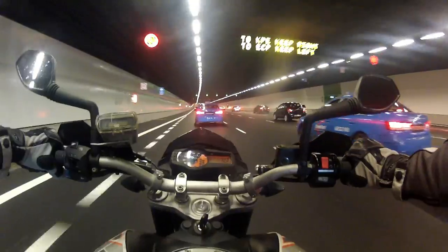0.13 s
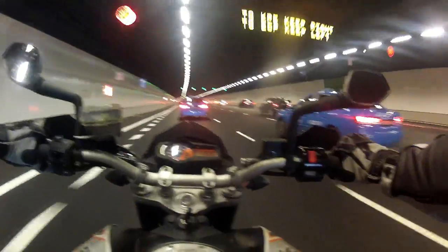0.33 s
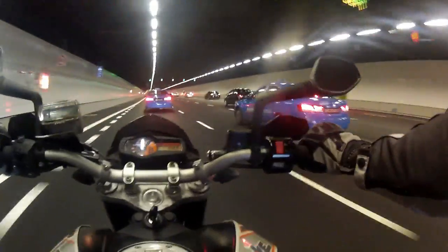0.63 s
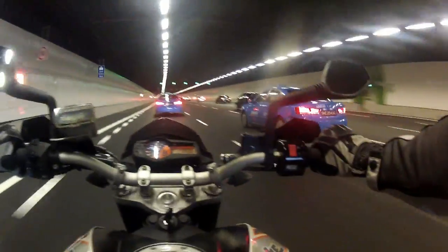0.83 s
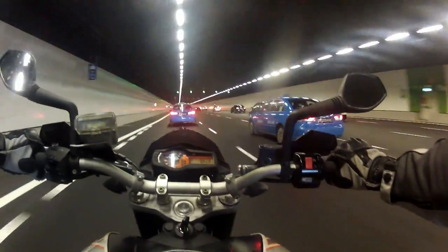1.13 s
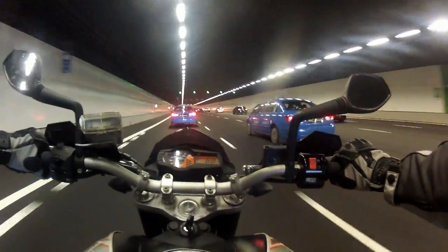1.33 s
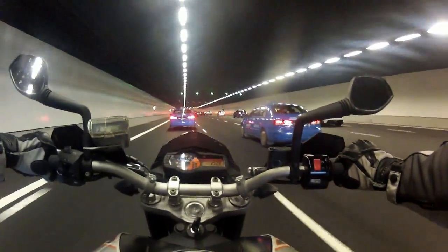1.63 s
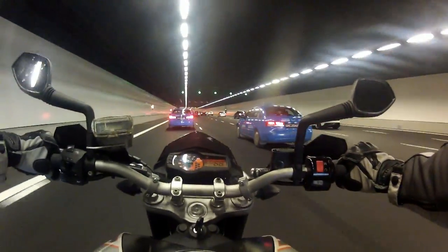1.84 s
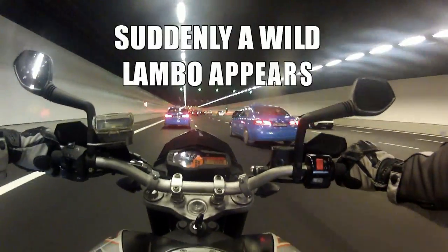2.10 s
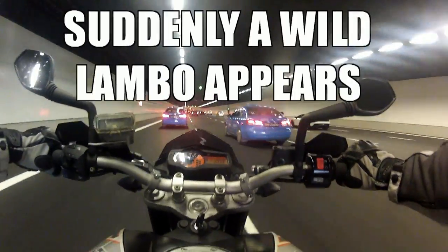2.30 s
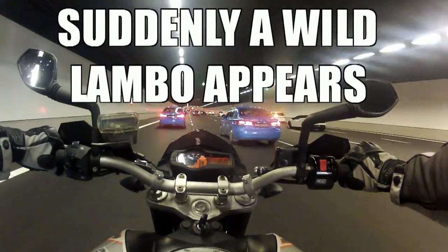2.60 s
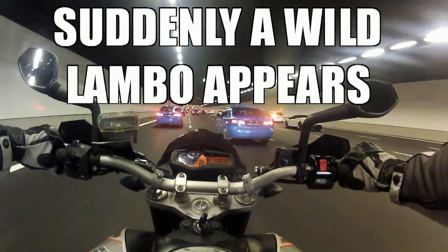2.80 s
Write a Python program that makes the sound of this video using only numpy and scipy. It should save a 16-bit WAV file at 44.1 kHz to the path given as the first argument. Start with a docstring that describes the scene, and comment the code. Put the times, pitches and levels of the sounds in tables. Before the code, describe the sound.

A motorcycle engine drones through a road tunnel, with muffled wind buffeting and traffic roar

```python
"""Motorcycle ride through a tunnel

Heard by a small camera in a closed housing. Engine orders, sines at multiples of the cycle rate, drone through
frame and tunnel. The airstream buffets and hisses as band noise; wind slaps and one brief tone are swelling sines.
Tyres and traffic roar as muffled noise; a second drone passes and faint noise ticks sound.
The recorder rides its gain and holds each sample of a 12 kHz stream, which mirrors the bass into the treble."""
import sys
import numpy as np
from scipy import signal
from scipy.io import wavfile

SR = 44100
rng = np.random.default_rng(int(sys.argv[2]) if len(sys.argv) > 2 else 0)


def generate_wav(sig):
    """Save sig (samples, or channels by samples) to the path in sys.argv[1] as 16-bit PCM at SR."""
    pcm = np.round(np.clip(np.atleast_2d(sig).T, -1, 1) * 32767).astype(np.int16)
    wavfile.write(sys.argv[1], SR, pcm)


def how_loud(loudness_db):
    """Turn decibels into a plain amplitude multiplier (0 dB gives 1, 20 dB gives 10)."""
    steps = np.asarray(loudness_db, float) / 20
    return 10 ** steps


N = 130095

# Engine. Each row: time in seconds, cycle rate in Hz, rms of the 4th and of the 8th order in dB.
ENGINE = [(0.08, 34.45, -26, -23), (0.12, 35.08, -27, -15), (0.22, 34.73, -25, -38.5),
          (0.25, 34.56, -23, -20.5), (0.33, 34.84, -30, -22), (0.4, 34.65, -23.5, -49),
          (0.43, 34.08, -23, -35), (0.5, 34.17, -29, -37), (0.52, 34.1, -31, -66),
          (0.55, 34.52, -40, -22.5), (0.65, 34.19, -23, -25), (0.7, 34.03, -41, -33),
          (0.76, 34.18, -25, -25), (0.79, 34.34, -33, -20.5), (0.87, 34.5, -23, -35),
          (0.92, 34.45, -20, -20), (0.98, 34.53, -30, -21), (1.11, 34.36, -27.5, -19.5),
          (1.14, 34.57, -34, -33), (1.2, 34.91, -35, -22), (1.29, 34.49, -27, -48), (1.33, 34.4, -37, -27),
          (1.37, 34.62, -28, -46), (1.41, 34.34, -46, -35), (1.44, 34.57, -29, -34),
          (1.51, 34.7, -24.5, -25), (1.54, 34.7, -33.5, -21.5), (1.62, 34.92, -23.5, -20),
          (1.81, 35.91, -40, -18), (1.89, 35.55, -23.5, -19), (2.07, 35.81, -26.5, -19.5),
          (2.12, 36.3, -43, -19), (2.21, 35.7, -32, -25.5), (2.28, 35.77, -21, -18.5),
          (2.33, 36.19, -34.5, -17), (2.38, 35.94, -25.5, -33.5), (2.46, 35.99, -22, -21),
          (2.58, 36.05, -24, -36), (2.71, 36.16, -21.5, -26), (2.77, 36.77, -26, -53),
          (2.79, 36.54, -24, -20), (2.85, 36.2, -21.5, -23.5), (2.86, 36.3, -21.5, -42),
          (2.93, 36.44, -28, -18.5)]
# Weaker orders. Each row: multiple of the cycle rate, base level in dB, share of the buffeting swing followed.
WEAK_ORDERS = [(1, -48, 0.73), (2, -37.5, 0.82), (3, -36.5, 0.6), (5, -35, 0.48), (6, -37, 0.14),
               (7, -37, 0.34), (9, -34.5, 0.19), (10, -38, .3), (12, -42, 0.18), (14, -39, .1),
               (16, -45, 0.082), (18, -45, .1), (20, -45.5, .1)]
# Weaker orders standing out. Each row: centre in seconds, length in seconds, multiple, peak rms in dB.
ORDER_SWELLS = [(0.224, 0.8, 3, -29), (0.206, 0.14, 6, -27), (0.334, 0.098, 10, -23), (0.655, 0.4, 3, -26),
                (.95, 0.12, 3, -34), (0.946, 0.32, 6, -30), (1.1, 0.19, 10, -33), (1.31, .7, 12, -32),
                (2.002, 1.0, 12, -29), (1.628, 0.16, 20, -34), (1.883, .35, 16, -31),
                (1.957, .14, 18, -34.5), (2.092, 0.52, 14, -41.5), (2.433, 0.082, 6, -24.5),
                (2.714, 0.54, 6, -26.5), (2.744, 0.42, 7, -27.5)]
WAVER_DB, WAVER_HZ, PHASE_WANDER_RAD = 3.5, 2.74, 0.35

# Airstream strength. Each row: time in seconds, hiss level in dB, buffeting level in dB.
GUST = [(.06, -40.5, -37.5), (.3, -41.5, -23), (.5, -41.5, -25.5), (.62, -38.5, -34), (.8, -38, -18.5),
        (.95, -36, -19.5), (1.1, -39, -21.5), (1.26, -38.5, -28.5), (1.5, -38, -26.5), (1.62, -41.5, -29.5),
        (1.8, -44.5, -41.5), (1.92, -42.5, -28.5), (2.05, -50.5, -42), (2.2, -46, -34.5),
        (2.36, -45.5, -36), (2.5, -40, -28), (2.65, -40, -29), (2.8, -38.5, -27.5), (2.95, -40.5, -33)]
# Hiss spectrum. Each row: frequency in Hz, relative density in dB per Hz.
HISS_SPECTRUM = [(600, -29.5), (900, -8), (1380, -9.5), (1900, -4.5), (2500, -8.5), (3100, -9),
                 (3500, -22.5), (3800, -11), (4300, -19), (5000, -14), (6300, -23)]
# Throb of the hiss once an engine cycle. Each row: time in seconds, depth as a fraction.
HISS_THROB = [(0, .25), (.3, 0.05), (1.1, 0), (1.25, 0.34), (1.55, 0.28), (1.8, 0.16), (2.2, 0.23),
              (2.5, 0.25), (2.75, 0.13), (2.95, 0.1)]
THROB_PEAK_S = 1.414  # moment of one throb
# Housing cavities the hiss rings in. Each row: frequency in Hz, width in Hz, level relative to the air in dB.
CAVITIES = [(2430, 280, -7.5), (3220, 300, -13.5), (3850, 130, -16.5), (4340, 120, -26.5)]
# Buffeting spectrum. Each row: frequency in Hz, relative density in dB per Hz.
BUFFET_SPECTRUM = [(18, -4), (30, -4.5), (70, -5), (130, -7), (250, -8), (450, -15), (800, -28),
                   (1200, -25)]
# Slaps of wind and one brief tone. Each row: start in seconds, sine level before its swell in dB,
# pitch in Hz, length in cycles.
SLAPS_AND_TONE = [(0.393, -19, 107, 1.1), (0.416, -21, 135, 1.3), (0.473, -5.5, 100, 1.64),
                  (.757, -28, 91, 0.76), (2.497, -14.5, 330, 13.5), (2.855, -17, 60, 1.6)]

# Roar spectrum. Each row: frequency in Hz, relative density in dB per Hz.
ROAR_SPECTRUM = [(40, -18), (100, -8), (200, -7.5), (330, 1), (480, -7.5), (600, -4.5), (700, -4),
                 (900, -3.5), (1300, -18)]
ROAR_DB, ROAR_FOLLOWS = -22, 0.62  # level before muffling, share of the hiss swing followed
ROAR_CUT_HZ, ROAR_LEAK_DB = 702, -24  # the housing shuts out the roar above this, but for a leak
# Steady tyre hiss spectrum. Each row: frequency in Hz, relative density in dB per Hz.
TYRE_SPECTRUM = [(900, 9.5), (1500, -5.5), (2400, -1.5), (3400, -12.5), (4500, -12.5), (6300, -29)]
TYRES_DB = -46

# Second drone, likely a car alongside. Each row: time in seconds, pitch in Hz before NEIGHBOUR_TUNE, rms in dB.
NEIGHBOUR = [(1.45, 351.4, -28), (1.549, 361.8, -24.5), (1.698, 363.2, -25), (1.85, 369, -30),
             (2.05, 369.4, -29), (2.3, 375, -32)]
NEIGHBOUR_TUNE = 0.97
# Faint ticks, perhaps the mount. Each row: start in seconds, initial noise level before the band-pass in dB.
TICKS = [(1.256, -29), (1.977, -33), (2.116, -35.5), (2.78, -31)]
TICK_DECAY_S = 0.004

# Recorder.
START_S = 0.0575
THRESHOLD_DB, SQUEEZE_DB_PER_DB, RELEASE_DB_PER_S, ATTACK_S = -10, 0.7, 150, 0.002
BAND_EDGE_HZ, EDGE_LEAK_DB = 5420, -11.5


def in_time(rows):
    """Columns of a table after the time, joined by straight lines."""
    time_s, *columns = np.transpose(rows)
    return [np.interp(np.arange(N) / SR, time_s, column) for column in columns]


def rms_one(x):
    """Scale to unit rms."""
    return x / np.sqrt(np.mean(x ** 2) + 1e-20)


def drift(rate_hz):
    """Slow random drift of unit spread: noise through a two-pole low-pass at SR / 40."""
    pole = np.exp(-80 * np.pi * rate_hz / SR)
    noise = rng.standard_normal(N // 40 + 2002)
    slow = signal.lfilter([1], [1, -2 * pole, pole * pole], noise)[2000:]  # settled part
    return np.interp(np.arange(N) / 40, np.arange(len(slow)), rms_one(slow))


def banded_noise(spectrum, shared_db, own_db, rate_hz):
    """Third-octave bands of noise that swell together and flicker alone; rms 1."""
    hz, level_db = np.transpose(spectrum)
    bands = int(3 * np.log2(hz[-1] / hz[0]))
    edges_hz = hz[0] * 2 ** (np.arange(bands + 1) / 3)
    white = rng.standard_normal((2, N))  # neighbouring bands take different noise
    together = drift(rate_hz)
    out = 0
    for k, (low, high) in enumerate(zip(edges_hz, edges_hz[1:])):
        sos = signal.butter(2, [low, high], "band", fs=SR, output="sos")
        band = signal.sosfilt(sos, white[k % 2])
        mean_db = np.interp(np.log(low * high) / 2, np.log(hz), level_db)
        out = out + band * how_loud(mean_db + shared_db * together + own_db * drift(rate_hz))
    return rms_one(out)


def order(phase, multiple, level_db):
    """One order: a sine of given rms whose phase wanders a little."""
    wander = PHASE_WANDER_RAD * drift(9.9) + rng.uniform(0, 2 * np.pi)
    return np.sqrt(2) * how_loud(level_db) * np.sin(multiple * phase + wander)


def engine(phase, swing_db):
    """Two strong orders swell and fade; weaker ones waver, follow the buffeting and now and then stand out."""
    t = np.arange(N) / SR
    _, fourth_db, eighth_db = in_time(ENGINE)
    out = order(phase, 4, fourth_db) + order(phase, 8, eighth_db)
    for multiple, level_db, follows in WEAK_ORDERS:
        size = how_loud(level_db + follows * swing_db + WAVER_DB * drift(WAVER_HZ))
        for centre_s, length_s, swelling, peak_db in ORDER_SWELLS:
            if round(swelling) == round(multiple):
                arch = np.cos(np.pi * np.clip((t - centre_s) / length_s, -0.5, 0.5))
                size = size + how_loud(peak_db) * arch
        out += size * order(phase, round(multiple), 0)
    return out


def buffeting(level_db):
    """Airstream turbulence at the housing: low noise whose bands swell strongly."""
    return how_loud(level_db) * banded_noise(BUFFET_SPECTRUM, shared_db=2.5, own_db=6.5, rate_hz=10.5)


def hiss(phase, level_db):
    """Air rushing past the housing rings in its cavities, partly shaken in step with the engine."""
    turn = phase - phase[int(THROB_PEAK_S * SR)]
    throb = 1 + in_time(HISS_THROB)[0] * (np.cos(turn) + 0.52 * np.cos(2 * turn))
    air = banded_noise(HISS_SPECTRUM, shared_db=-0.5, own_db=0.53, rate_hz=28)
    rings = 0
    for hz, width_hz, db in CAVITIES:
        b, a = signal.iirpeak(hz, hz / width_hz, fs=SR)
        rings = rings + how_loud(db) * rms_one(signal.lfilter(b, a, air))
    return how_loud(level_db) * throb * rms_one(air + rings)


def slaps_and_tone():
    """Slaps of wind and one brief tone: each swings for its number of cycles under a sine-squared swell."""
    out = np.zeros(N + SR)
    t = np.arange(SR // 8) / SR
    for start_s, db, hz, cycles in SLAPS_AND_TONE:
        first = int(start_s * SR)
        swell = np.sin(np.pi * np.minimum(t * hz / cycles, 1)) ** 2
        out[first:first + len(t)] -= how_loud(db) * swell * np.sin(2 * np.pi * hz * t)
    return out[:N]


def road(swing_db):
    """Roar of tyres and traffic in the tunnel, muffled by the housing, over a faint tyre hiss."""
    roar = banded_noise(ROAR_SPECTRUM, shared_db=1.46, own_db=0.0, rate_hz=15)
    sos = signal.butter(N=8, Wn=ROAR_CUT_HZ, fs=SR, output="sos")
    leak = how_loud(ROAR_LEAK_DB + 2.5 * drift(9.9)) * roar
    muffled = signal.sosfilt(sos, roar) + leak
    tyres = how_loud(TYRES_DB) * banded_noise(TYRE_SPECTRUM, shared_db=2.4, own_db=0.5, rate_hz=26.0)
    return how_loud(ROAR_DB + ROAR_FOLLOWS * swing_db) * muffled + tyres


def neighbour():
    """One gliding tone that fades in and out."""
    hz, level_db = in_time(NEIGHBOUR)
    t = np.arange(N) / SR
    inside_s = np.minimum(t - NEIGHBOUR[0][0], NEIGHBOUR[-1][0] - t)
    fade = np.clip(inside_s / 0.13 + 1, 0, 1)
    phase = 2 * np.pi * np.cumsum(hz) / SR
    return fade * order(phase, NEIGHBOUR_TUNE, level_db)


def ticks():
    """Bursts of bright noise that die in a few milliseconds."""
    out = np.zeros(N + SR)
    t = np.arange(SR // 40) / SR
    for start_s, db in TICKS:
        first = int(start_s * SR)
        out[first:first + len(t)] += how_loud(db) * rng.standard_normal(len(t)) * np.exp(-t / TICK_DECAY_S)
    sos = signal.butter(2, [1000, 4200], "band", fs=SR, output="sos")
    return signal.sosfilt(sos, out[:N])


def scene():
    """Engine, wind at the housing, brief tone, road, second drone and ticks; one channel."""
    hiss_db, buffet_db = in_time(GUST)
    phase = 2 * np.pi * np.cumsum(in_time(ENGINE)[0]) / SR
    mix = engine(phase, buffet_db - buffet_db.mean())
    mix = mix + buffeting(buffet_db) + hiss(phase, hiss_db) + slaps_and_tone()
    mix = mix + road(hiss_db - hiss_db.mean()) + neighbour() + ticks()
    return mix[None]


def ride_gain(x):
    """Gain ducks after peaks over the threshold and recovers at a steady rate in dB."""
    fall_db = RELEASE_DB_PER_S * np.arange(N) / SR
    over_db = np.maximum(20 * np.log10(np.abs(x) + 1e-9) - THRESHOLD_DB, 0)
    held_db = np.maximum.accumulate(over_db + fall_db) - fall_db
    pole = np.exp(-1 / (ATTACK_S * SR))
    return x * how_loud(-SQUEEZE_DB_PER_DB * signal.lfilter([1 - pole], [1, -pole], held_db))


def hold_samples(x):
    """Band-cut, sample at 12 kHz and hold four steps of 48 kHz: the band mirrors above 6 kHz."""
    sos = signal.butter(N=16, Wn=BAND_EDGE_HZ, fs=SR, output="sos")
    cut = signal.sosfiltfilt(sos, x)
    x = cut + how_loud(EDGE_LEAK_DB) * (x - cut)
    steps = np.repeat(signal.resample_poly(x, 40, 147), 4)
    return signal.resample_poly(steps, 147, 160)[:N]


def low_pass(x):
    """Removes everything above the highest recorded frequency."""
    return signal.sosfilt(signal.butter(12, 15190, fs=SR, output="sos"), x)


def record(dry):
    """Gain riding, then sample holding; silent until START_S."""
    x = hold_samples(ride_gain(dry[0]))
    x = x * np.clip((np.arange(N) / SR - START_S) / 0.00067, 0, 1)
    return low_pass(x[None])


dry = scene()
out = record(dry)
generate_wav(out)
```